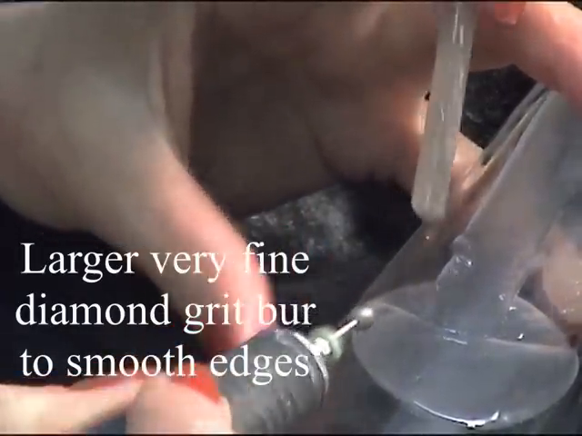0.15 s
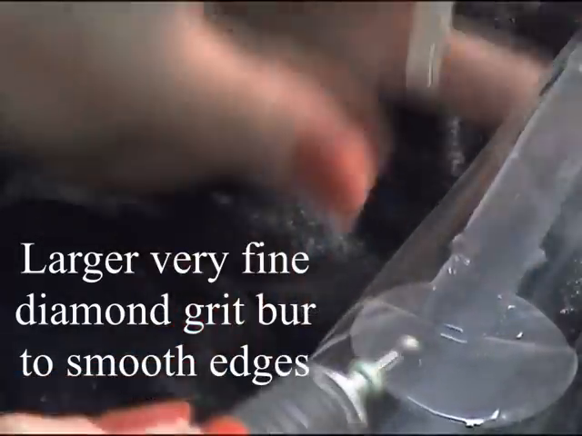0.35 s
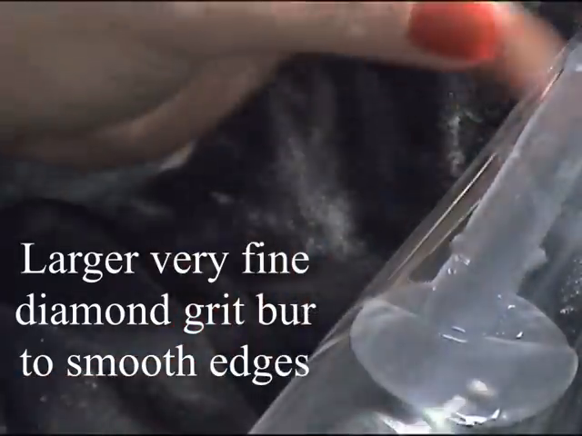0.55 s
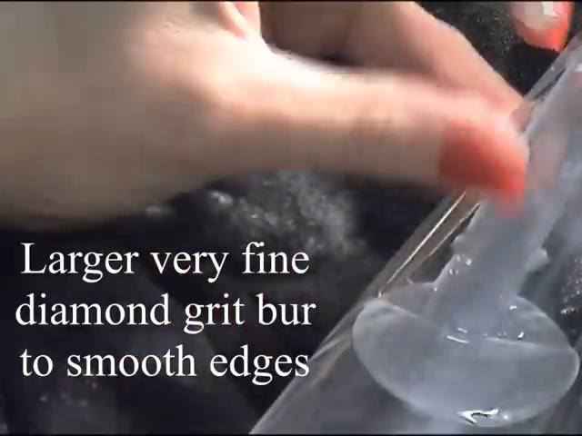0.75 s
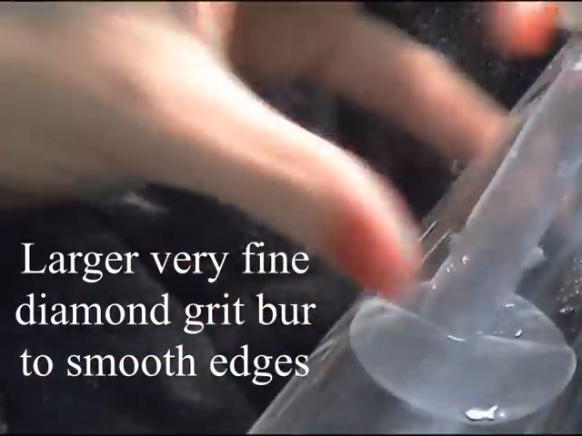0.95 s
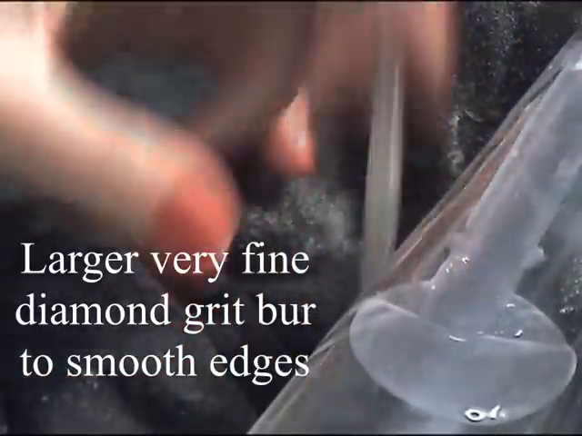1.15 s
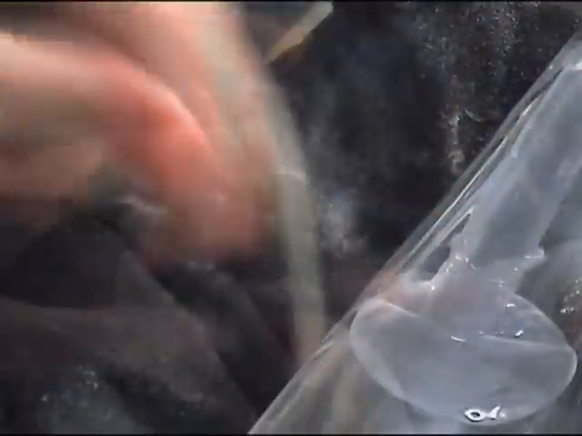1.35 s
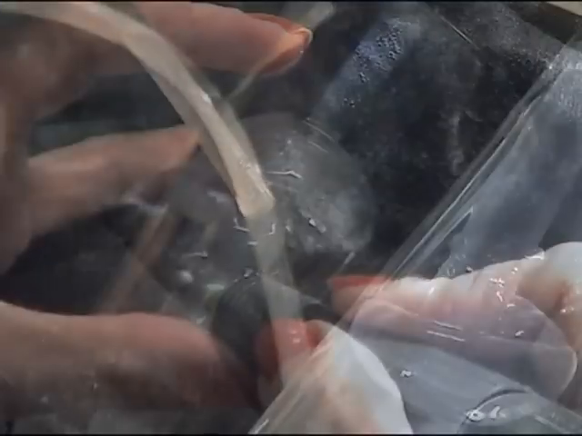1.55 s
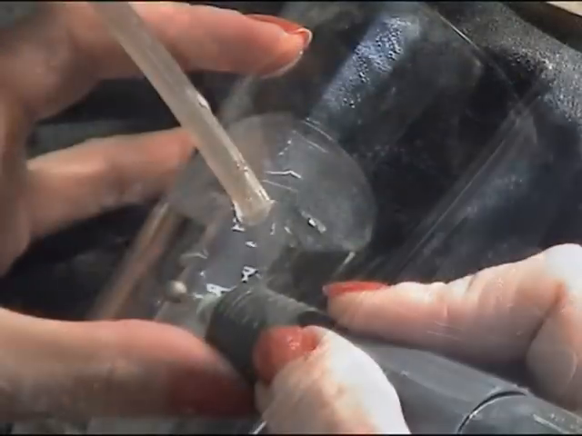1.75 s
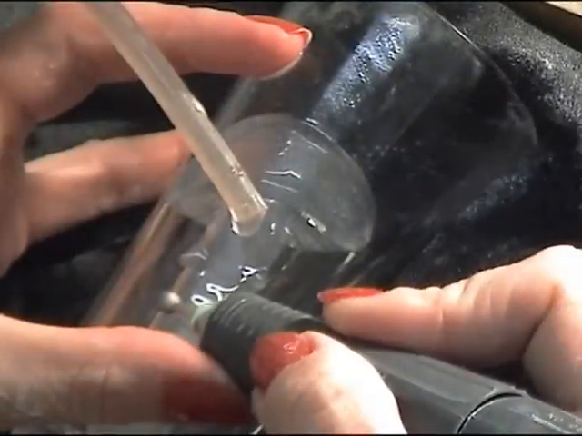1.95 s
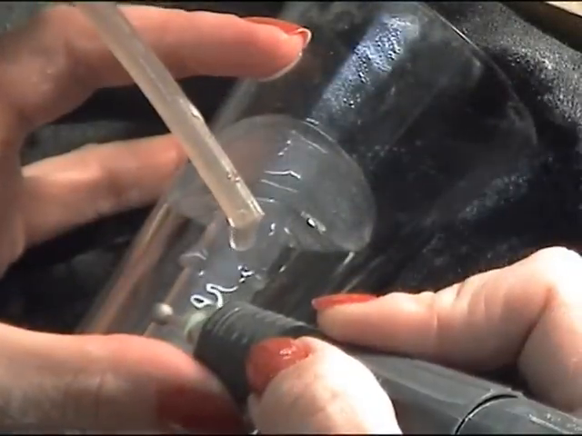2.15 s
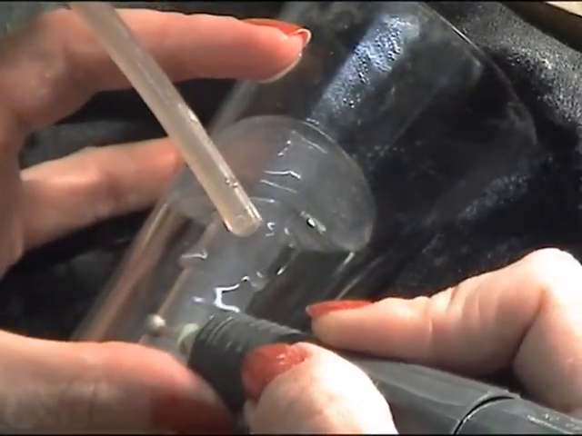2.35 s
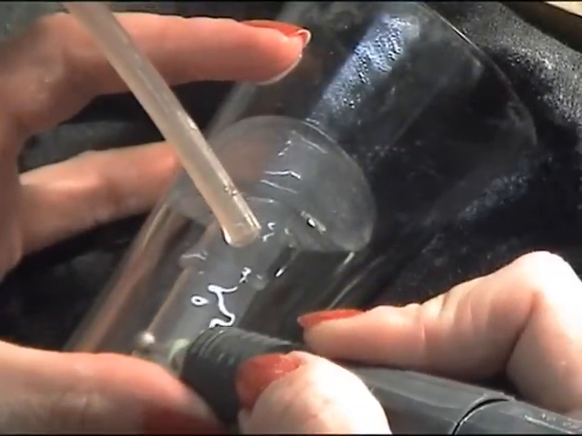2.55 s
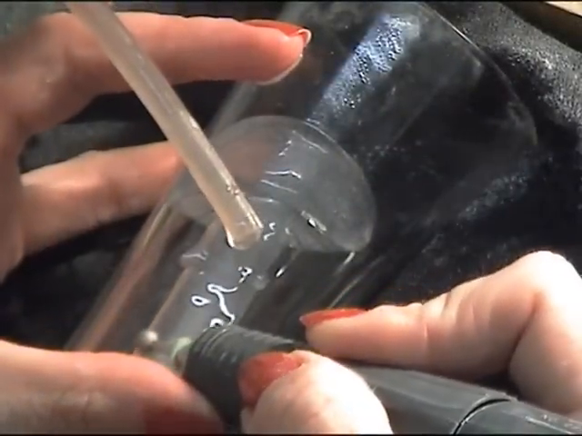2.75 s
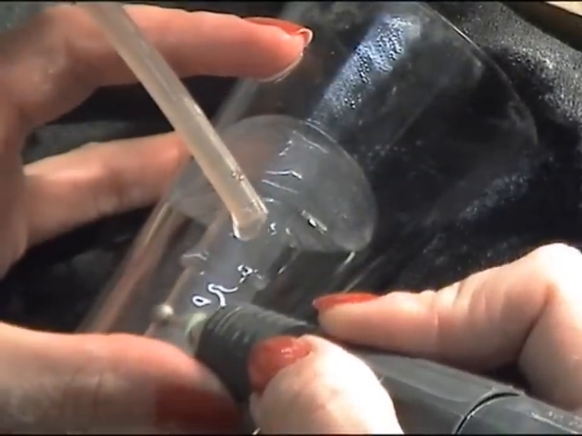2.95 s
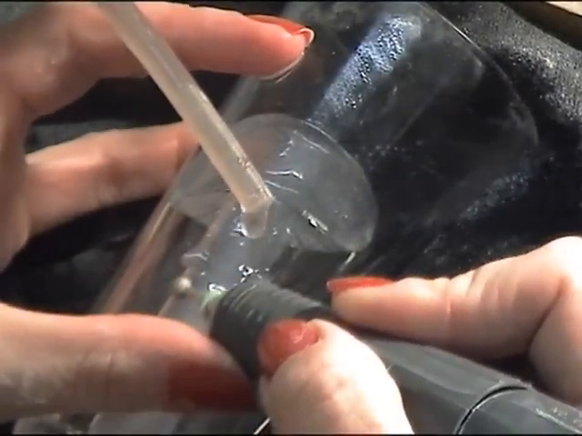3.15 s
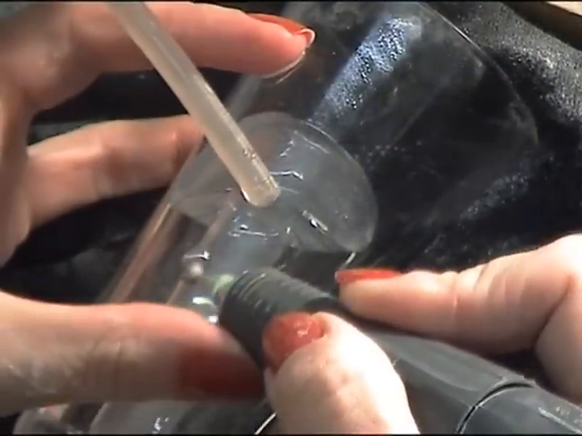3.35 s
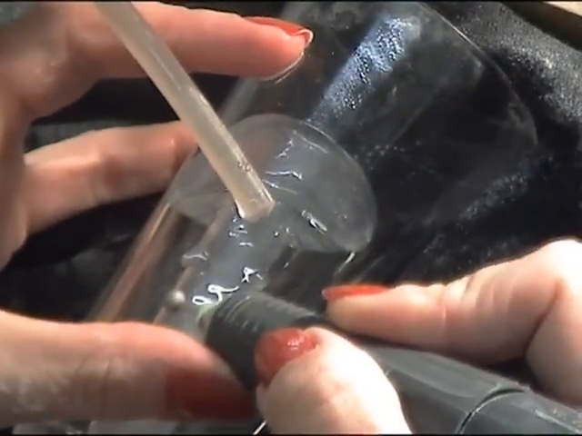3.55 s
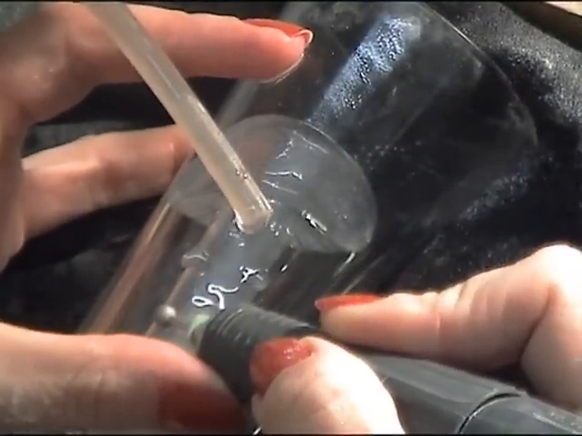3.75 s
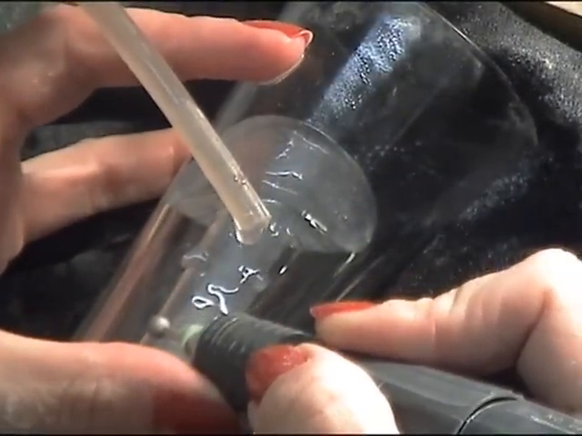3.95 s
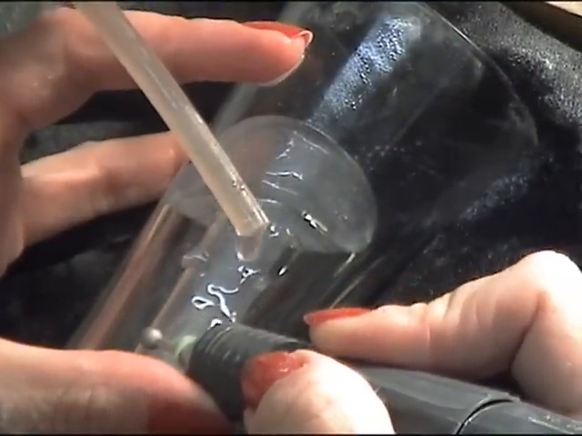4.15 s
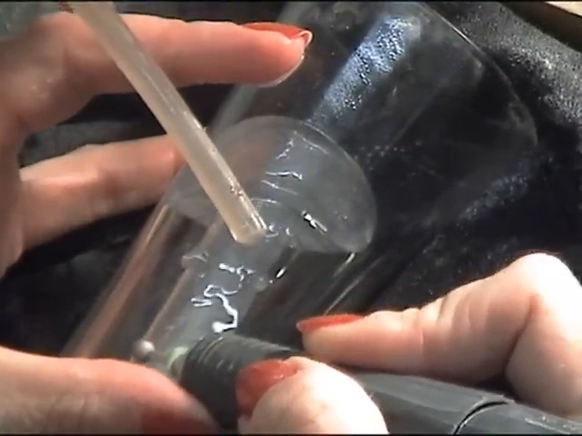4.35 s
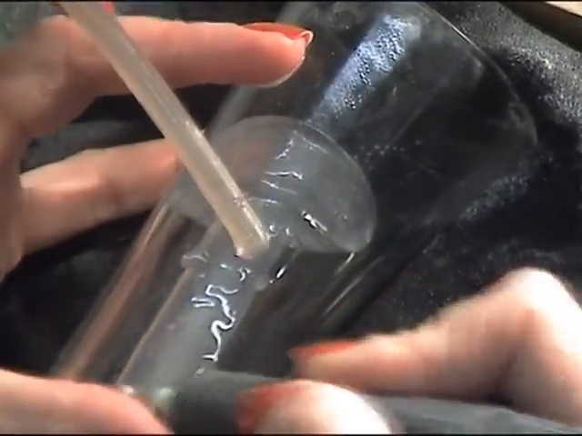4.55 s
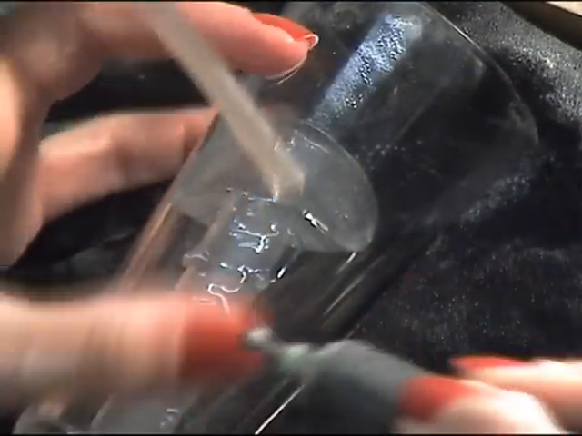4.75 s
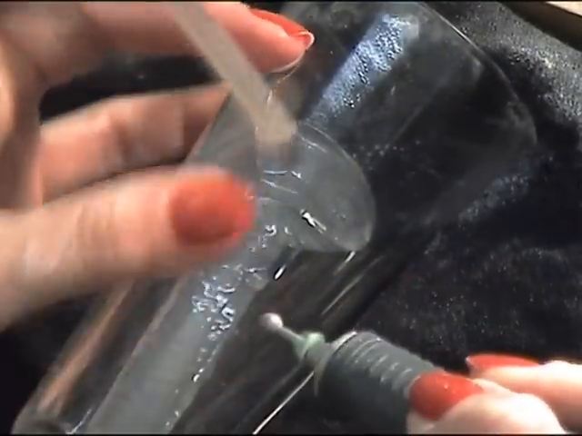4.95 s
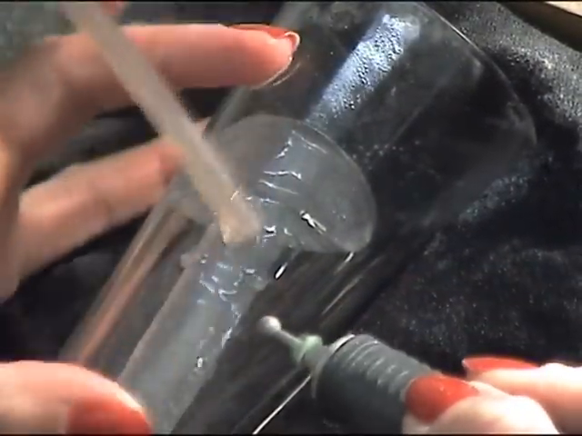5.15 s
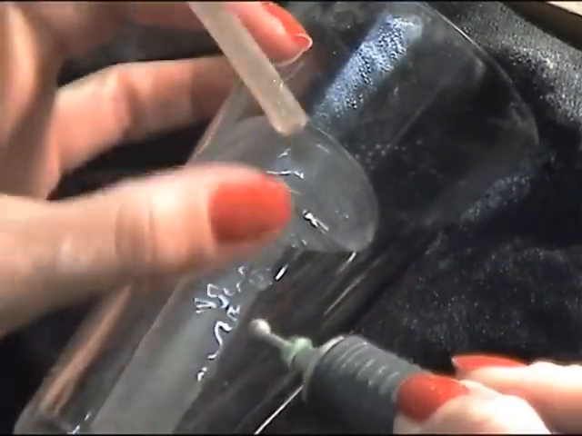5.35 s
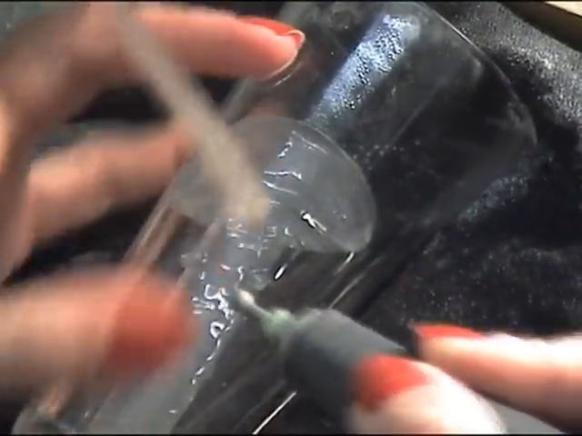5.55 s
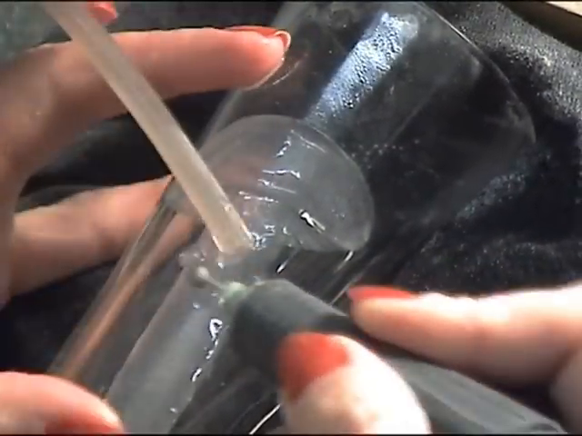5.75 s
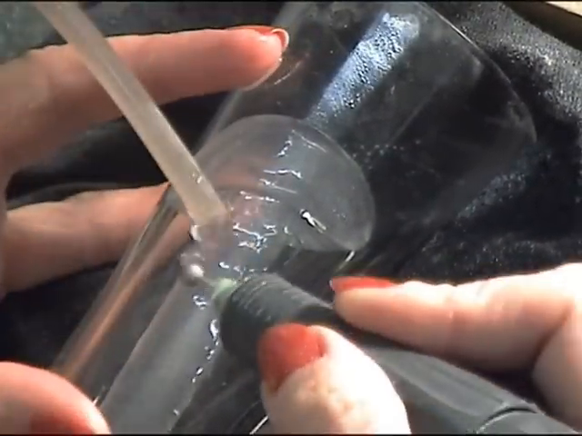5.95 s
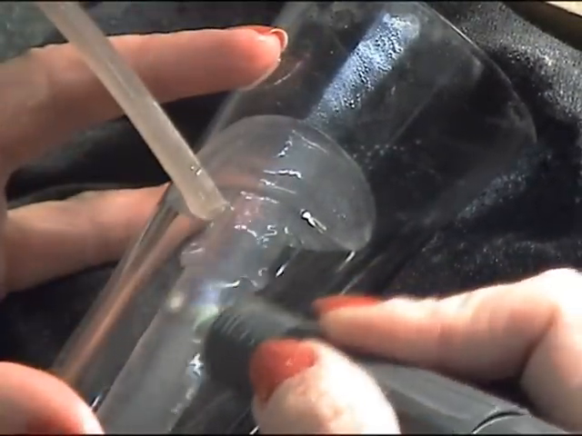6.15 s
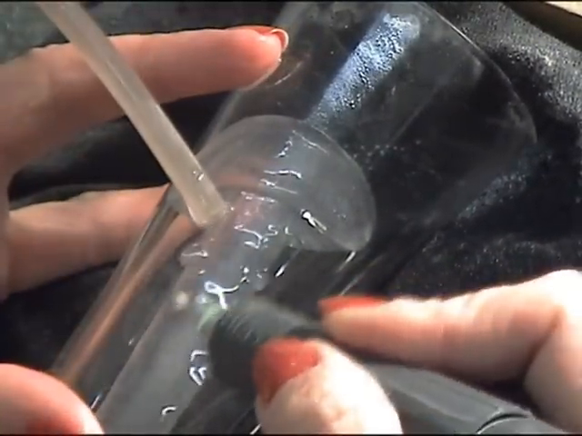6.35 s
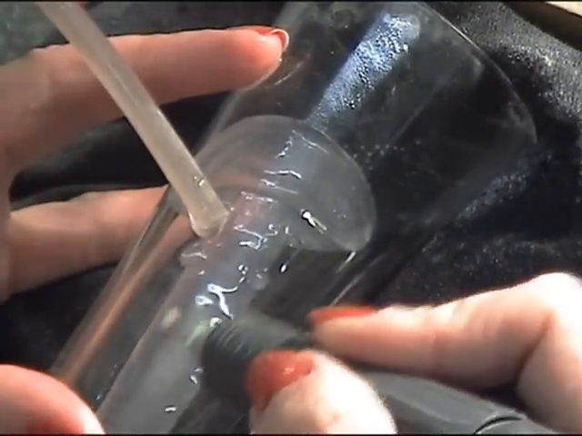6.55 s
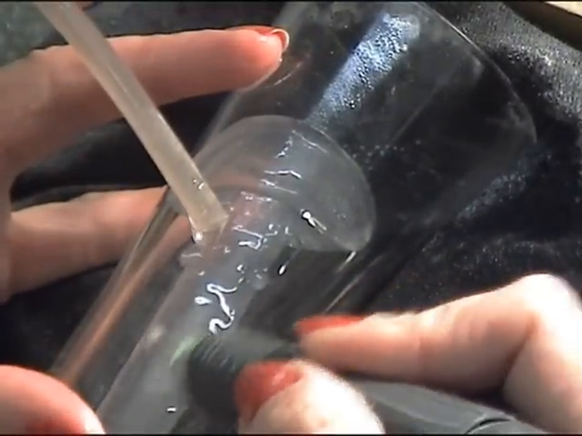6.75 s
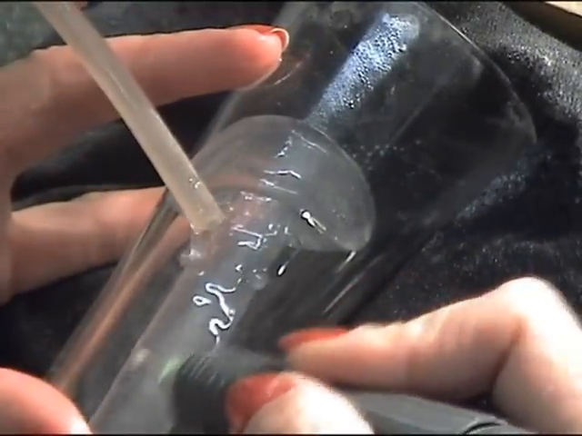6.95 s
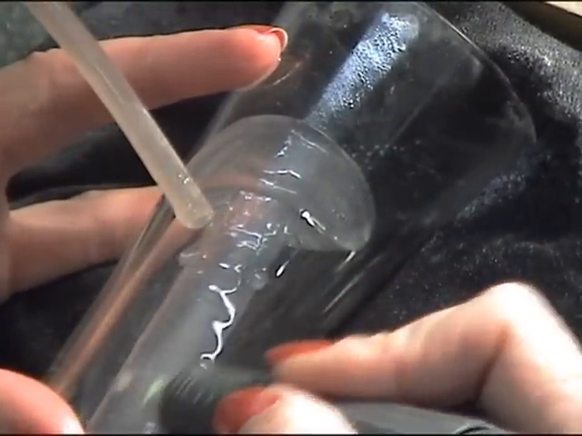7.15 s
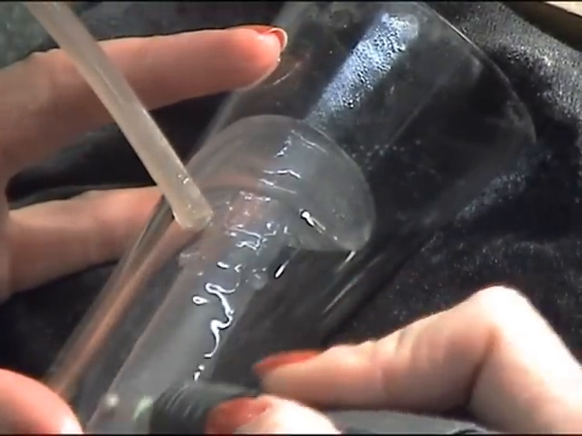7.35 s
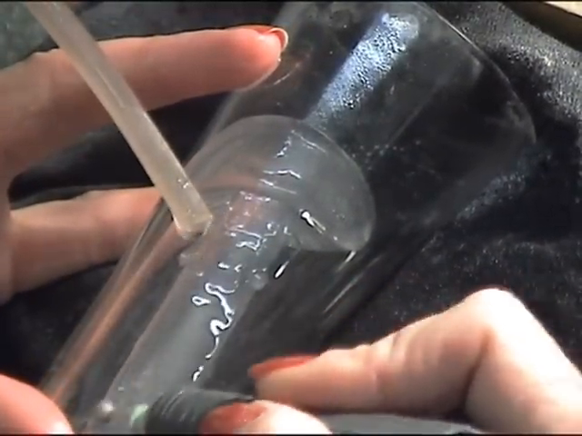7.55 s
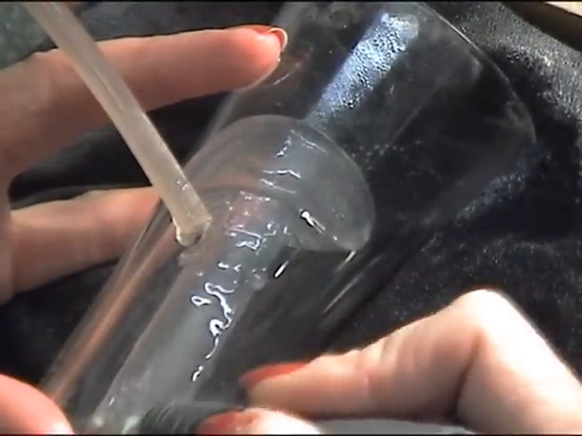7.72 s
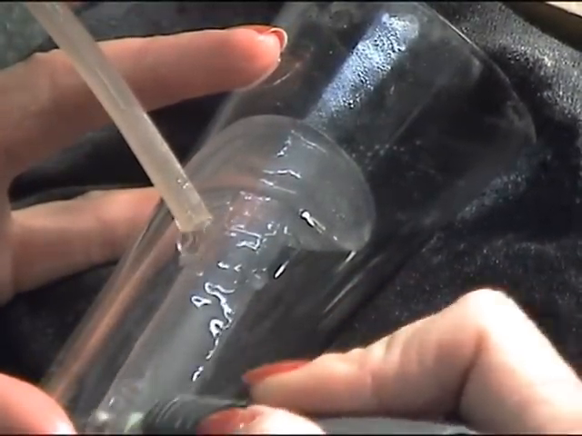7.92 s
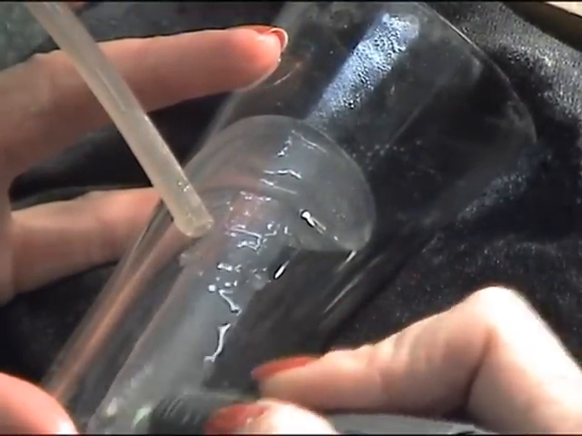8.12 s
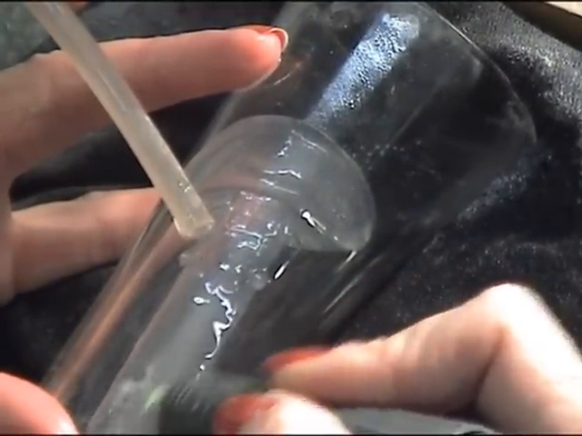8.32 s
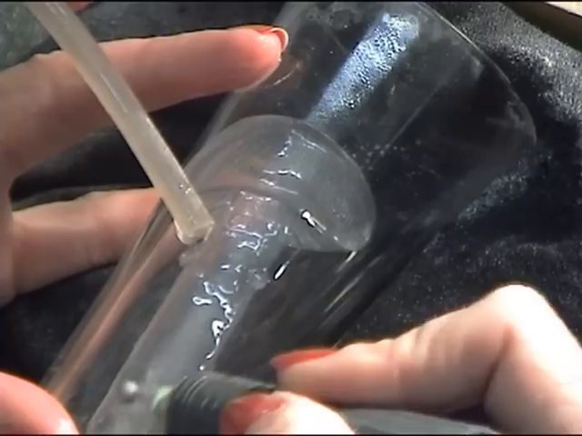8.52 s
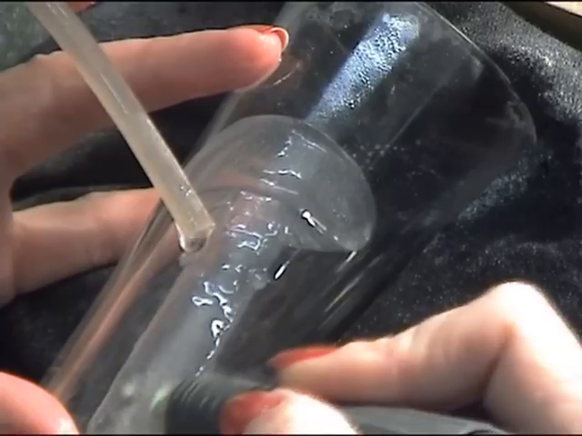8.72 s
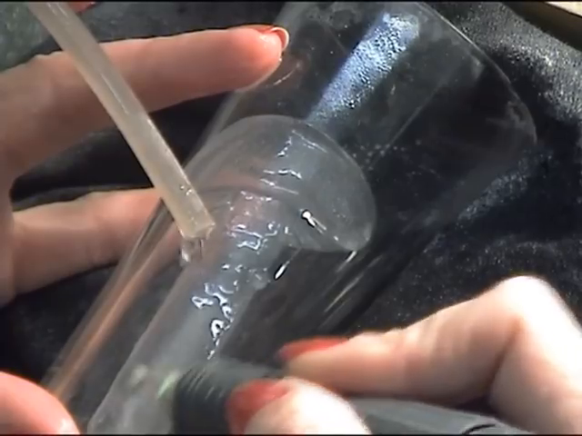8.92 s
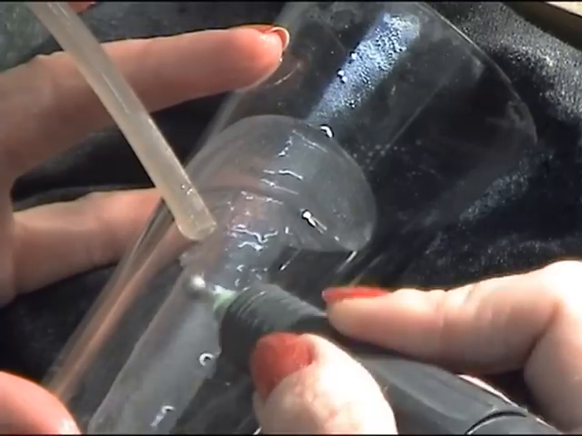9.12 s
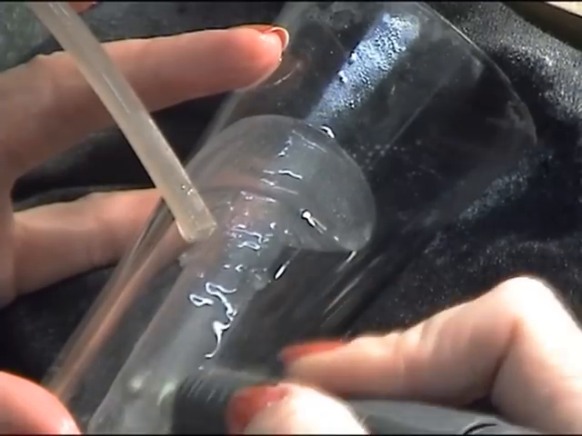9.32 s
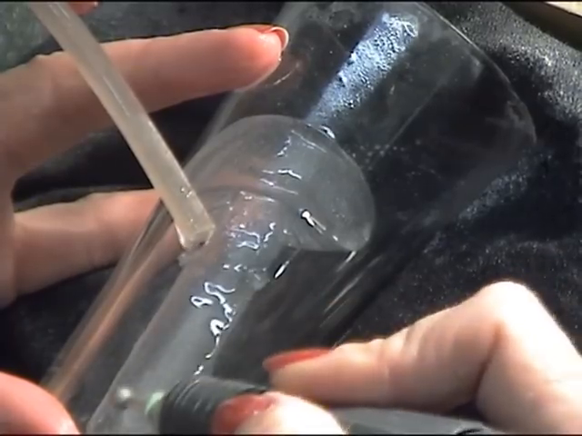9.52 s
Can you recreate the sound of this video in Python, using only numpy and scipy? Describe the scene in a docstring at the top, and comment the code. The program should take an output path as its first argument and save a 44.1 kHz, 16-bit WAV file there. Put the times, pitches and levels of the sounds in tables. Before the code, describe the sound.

A small rotary drill idles and winds down, then whines faster while its fine bur grinds wet glass with hissing, glassy scratching strokes.

```python
"""A small rotary drill with a fine diamond bur smooths wet glass, heard close up.
It idles at low speed and runs down; then, running faster, it grinds one light pass and rubs to and fro.
Its whine is a stack of multiples of the shaft speed, and its bearing hiss is noise that swells each turn.
Grit makes a rough force tied to the turning shaft, which scratches and rings the glass.
A few knocks come from handling; behind it all are workshop air, steady tones and a low drone."""
import sys
import numpy as np
from scipy import signal
from scipy.fft import rfft, irfft
from scipy.io import wavfile
from scipy.ndimage import uniform_filter1d, map_coordinates

SR = 44100
rng = np.random.default_rng(int(sys.argv[2]) if len(sys.argv) > 2 else 0)


def write(x):
    x = np.atleast_2d(x).T
    wavfile.write(sys.argv[1], SR, np.round(np.clip(x, -1, 1) * 32767).astype(np.int16))


N = 426888
TIME = np.arange(N) / SR  # seconds

# Slow run: it idles, is switched off and coasts down; the level falls with the speed.
IDLE_HZ, OFF_S, COAST_S = 326, 1.06, .5
IDLE_DB, COAST_DB_PER_OCTAVE = -38, 20.5
# Whine at low speed, relative levels: (multiple of the shaft speed, level [dB])
SLOW_WHINE = [(1, -15), (2, -22), (3, -19), (4, -10), (5, -13), (6, -5.5), (7, -5), (8, -8), (9, -15),
              (10, -10), (11, -7), (12, -6), (13, -5.5), (14, -5), (15, -5.5), (16, -7), (17, -7), (18, -8),
              (19, -23), (20, -20), (21, -1), (22, -21), (23, 6), (24, -6), (25, 6), (26, -18), (27, -16),
              (28, 0.5), (29, -6), (30, -1), (31, -15), (32, 2), (33, 1), (34, 2), (35, 2), (36, -12),
              (37, -6), (38, -3), (39, -1), (40, 3), (41, -4), (42, -7), (43, 6.5), (44, -5), (45, -5),
              (46, -5), (47, -2)]
# Two partials that swell up before the switch-off and glide down: (multiple of the shaft speed, level [dB])
RUN_DOWN = [(6, -61), (10, -52)]
RUN_DOWN_SWELL_S, RUN_DOWN_DB_PER_OCTAVE = .3, 13

# Fast run: it fades in as the slow run fades out; a firm press slows the shaft.
FAST_HZ, FAST_DB, SAG_HZ = 440.2, -32, 3
FAST_S, FADE_IN_S, FADE_OUT_S = 1.385, 0.36, .08
# Whine at working speed, relative levels: (multiple of the shaft speed, level [dB])
FAST_WHINE = [(1, -43.5), (2, -77), (3, -18), (4, -14.5), (5, -11.5), (6, -11.5), (7, -8.5), (8, -15.5),
              (9, -10), (10, -5.5), (11, -8), (12, -13), (13, -15.5), (14, -15), (15, -12), (16, -26),
              (17, -9), (18, -4), (19, -7), (20, -8), (21, -5), (22, -20), (23, -5.5), (24, -30), (25, -5),
              (26, -12), (27, -8.5), (28, 3), (29, -6), (30, -5), (31, -1), (32, 3), (33, 1.5), (34, -5),
              (35, -13)]
# Boost of the whine by the housing ring near 4.4 kHz: (time [s], boost [dB])
HOUSING_LOW = [(1.5, 1.5), (2.7, 5.5), (3.3, -1), (4.5, 2), (5, -2), (6.4, 0.5), (9.1, -0.5), (9.45, 3)]
# As the hand turns, the ring near 8 kHz swells over its rest: (middle [s], length [s], added boost [dB])
HOUSING_MID, HOUSING_MID_REST_DB = [(2, .3, -3), (2.7, 0.27, -27), (4.05, .35, 6), (4.78, 0.26, 5.5),
                                    (5.9, 0.77, 7)], -1
# So does the ring near 14 kHz: (middle [s], length [s], added boost [dB])
HOUSING_HIGH, HOUSING_HIGH_REST_DB = [(2.3, 0.49, -4), (4.33, .3, -4), (5, .55, -2), (5.5, 0.57, 0)], -8
# Colour of the bearing hiss, relative levels: (frequency [Hz], level [dB per Hz])
BEARING = [(200, -14.5), (800, -11.5), (1500, -8), (1900, -1.5), (2700, 0.5), (4000, -2), (6200, -5.5),
           (7800, -1.5), (10000, -1), (13000, -3.5), (14000, 1), (15500, -6.5)]
# The bearings sizzle as the handpiece tilts, relative levels: (middle [s], length [s], added level [dB])
SIZZLES, SIZZLE_REST_DB = [(2.27, .45, -6), (3.5, .25, -4), (4.33, .3, -5), (5.25, .9, -17)], -22
# The shaft shakes the work, changing with the grip, levels before the load acts:
# (time [s], once a turn [dB], twice a turn [dB])
GRIP_HUM = [(1.5, -51, -53), (2.35, -53.5, -58), (2.9, -49, -45), (3.4, -52, -65), (3.85, -51, -52.5),
            (4.4, -52, -44.5), (4.8, -45.5, -56), (6.7, -53.5, -53.5), (7.15, -50.5, -47.5),
            (8.25, -47, -46), (9.2, -50, -56.5), (9.68, -47.5, -45.5)]
SHAKE_GROWTH = 0.55  # dB of shake per dB of load
FREE_LOAD_DB, LOAD_SMOOTH_S = -25, 0.14  # load of the lifted bur; the press is averaged this long

# The last touch of the slow run lets go: (time [s], press [dB])
LAST_TOUCH = [(0, -8), (.03, -28), (.05, -48)]
# The light pass, eased once on the way: (time [s], press [dB])
LIGHT_PASS = [(1.43, -12), (1.9, -13), (2.2, -8.5), (2.53, -13), (2.72, -33), (2.9, -12), (3.22, -6),
              (3.42, -13), (3.72, -5), (3.95, -5), (4.17, -11), (4.55, -11), (4.62, -29)]
# The bur rests on the glass between rubbing strokes: (time [s], press [dB])
RESTING = [(6.15, -13), (7.25, -11), (7.85, -22), (8.3, -16), (9.1, -12), (9.33, -13), (9.43, -23.5),
           (9.68, -14)]
# Each stroke adds to the resting press and eases again: (middle [s], length [s], added press [dB])
STROKES = [(6.195, 0.046, -2), (6.28, 0.18, -5.5), (6.445, .13, -4.5), (6.63, .17, -2), (6.82, .11, -6),
           (6.95, .15, -4.5), (7.06, 0.09, -3), (7.18, 0.083, -4), (7.385, .17, -2.5), (7.57, 0.093, -1.5),
           (7.76, 0.097, -3.5), (7.945, .11, -3), (8.13, 0.1318, -1.5), (8.315, .12, -2.5),
           (8.46, 0.099, -5.5), (8.64, 0.083, -5), (8.78, 0.15, -7.5), (8.94, .14, -7.5),
           (9.07, 0.17, -4.5), (9.245, 0.18, -0.5), (9.56, .1, -8.5)]
# The low ring grows in step with the press; the scratch and the high ring grow more slowly (dB per dB).
SCRATCH_GROWTH, HIGH_GROWTH = 0.19, 0.5
# Colour of the scratch in the light pass, relative levels: (frequency [Hz], level [dB per Hz])
LIGHT_SCRATCH = [(300, -15.5), (1400, -20), (1900, -3.5), (3400, -11), (4500, -3), (5600, -2.5), (7000, 4),
                 (7900, -1), (9600, -8), (11300, -15), (13600, -12), (15400, -12)]
# Colour of the scratch in the touch and rubbing, relative levels: (frequency [Hz], level [dB per Hz])
RUB_SCRATCH = [(300, -23.5), (1400, -25.5), (2100, -7.5), (2600, -18), (3100, -7.5), (3700, -16.5),
               (4900, -4.5), (5900, -9.5), (7200, 9), (7900, 1), (8700, -4.5), (10600, -7.5), (13300, -2),
               (15200, -28)]
# Lower wall modes of the glass, relative levels: (frequency [Hz], width [Hz], level [dB])
GLASS_LOW = [(4800, 130, -21), (5275, 63, -12.5), (6575, 51, -1), (6695, 15.6, 10.5), (6832, 46, 2.5),
             (7030, 33, -8), (6990, 95, -8.5), (7420, 94, -4.5), (7840, 84, -11), (8760, 56, -10),
             (9120, 71, -9.5)]
# Upper wall modes of the glass, relative levels: (frequency [Hz], width [Hz], level [dB])
GLASS_HIGH = [(10100, 25, -11), (11520, 18, -8.5), (11870, 29, -4), (12190, 50, 1.5), (12390, 77, 1.5),
              (12450, 47, -4.5), (12540, 32, 1.5), (12700, 77, -17)]
# The high ring depends on where the bur sits along the wall: (time [s], change [dB])
HIGH_PLACE = [(0, 0), (2.4, -2.5), (3.4, -2), (4.4, 2), (6.25, -2.5), (7.4, 1), (8.1, 0.5), (8.7, -2),
              (9.3, 1.5), (9.68, -5)]
# In the light pass one wall mode sings above its rest: (middle [s], length [s], added level [dB])
SINGING = [(2.1, 1, -46), (3.05, 0.65, -36), (3.8, 0.99, -45)]
SINGING_HZ = 9200
# The bur chatters in the light pass: (time [s], level [dB], centre of the buzz [Hz])
CHATTER = [(1.5, -65, 2100), (1.85, -39, 2080), (2.04, -40, 2104), (2.1, -47, 1730), (2.75, -50.5, 1700),
           (3.22, -43, 1900), (3.65, -46, 1810), (3.85, -59, 1640), (4.62, -57, 1600)]
# The bur catches an edge, relative peaks: (time [s], peak [dB])
CATCHES = [(6.1484, -15), (6.1816, -16), (7.2574, -16), (9.3573, -13), (9.3662, -18), (9.3873, -10.5),
           (9.3974, -25), (9.429, -13.5), (9.5298, -14.5), (9.5486, -24), (9.5754, -24), (9.5822, -18)]
# Handling bumps: (time [s], peak [dB], centre [Hz], half the width of each filter [Hz],
# time for the push to fade by 60 dB [s])
BUMPS = [(1.127, -30.5, 440, 130, 0.13), (4.793, -26, 1500, 1300, 0.12), (4.825, -25, 2960, 2600, 0.14),
         (5.74, -42, 683, 200, 0.29)]

# Colour of the workshop air, relative levels: (frequency [Hz], level [dB per Hz])
ROOM_AIR, ROOM_AIR_DB = [(25, 2.5), (60, 4), (150, 7), (300, -2), (800, -2.5), (1900, 4), (3200, -9),
                         (6000, 1), (15000, -16)], -50
# Steady workshop tones, relative levels: (frequency [Hz], level [dB])
ROOM_TONES = [(581.4, -64), (899.0, -63.5), (1163, -65.5), (1502, -63), (1798, -59.5), (2099, -59.5)]
# Low drone, relative levels: (time [s], level [dB])
DRONE = [(0, -82), (.8, -69), (1.45, -55.5), (1.8, -62.5), (2.5, -67), (2.7, -52), (3.35, -54.5),
         (3.9, -51.5), (4.45, -56), (5, -51.5), (5.5, -57.5), (6.8, -60), (7.3, -71), (9.68, -71)]
# Pitch around which the drone wavers: (time [s], pitch [Hz])
DRONE_PITCH = [(0, 78), (1.4, 81.9), (2.4, 81.7), (2.7, 89.75), (5, 86.4), (6, 82.2), (9.68, 80.05)]

# The two microphone ports at full lean: (frequency [Hz], left minus right [dB])
PORT_BALANCE = [(0, 0.11), (4000, 0), (6700, 2.06), (8200, 1.7), (12300, 2.4), (14200, 0)]
# Timing of the ports: (frequency [Hz], lead of the left [radians])
PORT_PHASE = [(0, 0.019), (15200, -0.11)]
TOP_HZ = 15300


def undb(db):
    """Decibels to gain."""
    return 10 ** (np.asarray(db) / 20)


def unit(x):
    """Scale to an average strength (rms) of 1."""
    return x / np.sqrt(np.mean(x ** 2))


def curves(table):
    """Each column of a table as a line through time."""
    s, *columns = np.transpose(table)
    return [np.interp(TIME, s, c) for c in columns]


def swells(table, rest_db):
    """Smooth rises and falls (half a cosine each) added to a resting gain; the result is in dB."""
    gain = undb(rest_db)
    for middle, length, db in table:
        gain = gain + undb(db) * np.cos(np.pi * np.clip((TIME - middle) / length, -.5, .5))
    return 20 * np.log10(gain)


def during(table, fade=0.0031):
    """One while the table lasts, zero outside, with short fades."""
    return np.clip(np.minimum(TIME - table[0][0], table[-1][0] - TIME) / fade + 1, 0, 1)


def fade_in(seconds):
    """From zero to one as the fast run comes in."""
    return np.clip((TIME - FAST_S) / seconds, 0, 1)


def walk(rate):
    """Slow chance: lines joining random points, rate points a second, with a spread near one."""
    points = rng.standard_normal(4096)
    return 1.2 * np.interp(TIME * rate, np.arange(len(points)), points)


def colour(x, points):
    """Shape a sound with a smooth (Hz, dB) spectrum and scale it to rms 1."""
    hz, db = np.transpose(points)
    f = np.maximum(np.arange(N // 2 + 1) * SR / N, 1)
    gain = undb(np.interp(np.log(f), np.log(hz), db))
    gain = gain * np.minimum(f / hz[0], 1)  # weaker below the first point
    return unit(irfft(rfft(x) * gain, N))


def resonate(x, hz, width):
    """One resonance, gain one at its centre."""
    return signal.lfilter(*signal.iirpeak(hz, hz / width, fs=SR), x)


def shaft(speed, wobble):
    """Turns made so far; the speed trembles a little."""
    return np.cumsum(speed * (1 + wobble * walk(40))) / SR


def whine(turns, orders, phases, flicker_db, rings=()):
    """Multiples of the shaft speed; each flickers, and those near a housing ring follow it."""
    out = 0
    total = np.sqrt(sum(undb(db) ** 2 for _, db in orders) / 2)
    for (k, db), phase in zip(orders, phases):
        db = db + flicker_db * walk(4)
        for centre, spread, ring_db in rings:
            db = db + ring_db * np.exp(-((k - centre) / spread) ** 2)
        angle = 2 * np.pi * ((k * turns + phase) % 1)
        out = out + undb(db.astype(np.float32)) * np.sin(angle.astype(np.float32))
    return out / total


def bearing(turns, depth):
    """Ball bearings hiss, swelling once a turn."""
    swell = 1 + depth * np.cos(2 * np.pi * turns)
    return colour(rng.standard_normal(N) * swell, BEARING)


def slow_run(turns, speed):
    """The drill idles and is switched off; coasting, high partials die first and low ones glide on."""
    octaves = np.log2(speed / IDLE_HZ)
    drive = np.minimum(speed / IDLE_HZ, 1) ** 6
    rings = [(36, 17, -28 * np.sqrt(1 - drive))]  # a dip in the high partials as the drive goes
    tone = whine(turns, SLOW_WHINE, rng.random(len(SLOW_WHINE)), flicker_db=3.5, rings=rings)
    hiss = bearing(turns, depth=0.25)
    coasting = np.sqrt(1 - drive) * unit(resonate(hiss, 8600, 3500))
    running = tone + undb(-4.5) * hiss + undb(-1.0) * coasting
    running = running * undb(IDLE_DB + COAST_DB_PER_OCTAVE * octaves)
    swell = np.clip((TIME - OFF_S) / RUN_DOWN_SWELL_S + 1, 0, 1)
    swell = swell * undb(RUN_DOWN_DB_PER_OCTAVE * octaves)
    glide = swell * sum(undb(db + 2 * walk(20)) * unit(np.sin(2 * np.pi * k * turns)) for k, db in RUN_DOWN)
    return (running + glide) * (1 - fade_in(FADE_OUT_S))


def fast_run(turns, load):
    """The drill at working speed; under load its imbalance shakes the work."""
    (low_db,) = curves(HOUSING_LOW)
    mid_db = swells(HOUSING_MID, HOUSING_MID_REST_DB)
    high_db = swells(HOUSING_HIGH, HOUSING_HIGH_REST_DB)
    rings = [(10, .9, low_db), (18, 1.4, mid_db), (32, 1.8, high_db)]  # centre and spread in multiples
    phases = rng.random(len(FAST_WHINE))
    tone = whine(turns, FAST_WHINE, phases, flicker_db=2.5, rings=rings)
    sizzle = resonate(resonate(bearing(turns, depth=.5), 13540, 1600), 14700, 1600)
    sizzle = undb(swells(SIZZLES, SIZZLE_REST_DB)) * unit(sizzle)
    sound = undb(-1.0) * tone + undb(-3) * bearing(turns, depth=0.26) + sizzle
    shake = 0
    for k, db in enumerate(curves(GRIP_HUM), 1):
        hum = unit(np.sin(2 * np.pi * (k * turns + phases[k - 1])))
        shake = shake + undb(db + 1.7 * walk(6.1)) * hum
    return sound * undb(FAST_DB) + shake * load ** SHAKE_GROWTH


def grit(turns, memory, track_db, chip_db, spread_db, swell, bounce):
    """Force at the bur: the same diamonds return every second turn, among fresh chips of random size."""
    size = 200  # random points in each two-turn pattern
    memory = np.clip(memory, 0, .99)  # how much of the pattern stays from one pass to the next
    passes = rng.standard_normal((int(turns[-1] / 2) + 2, size))
    track = signal.lfilter([1], [1, -memory], passes, axis=0).ravel()
    track = unit(map_coordinates(track, [turns / 2 * size], order=3))
    chip_size = undb(spread_db * np.minimum(rng.exponential(size=N), 3))
    chips = (rng.random(N) < 5000 / SR) * rng.choice([-1, 1], N) * chip_size  # about 5000 a second
    # The bur runs slightly off centre and bounces, so strong and weak turns alternate.
    contact = np.exp(swell * np.cos(2 * np.pi * turns) + bounce * np.cos(np.pi * turns))
    return unit((undb(track_db) * track + undb(chip_db) * unit(chips)) * contact)


def hops(rate_hz, uneven, contact):
    """The bur hops on the wall at an uneven pace; each landing is sudden and fades within a hop."""
    count = np.cumsum(rate_hz * np.exp(uneven * walk(110))) / SR
    size = rng.uniform(0.73, 1, int(count[-1]) + 1)
    return size[count.astype(int)] * np.exp(-(count % 1) / contact)


def ring(x, modes):
    """A body's modes, all driven by the same force; neighbours swing in opposite senses."""
    return sum((-1) ** k * undb(db) * resonate(x, hz, width) for k, (hz, width, db) in enumerate(modes))


def grind(press_db, force, scratch, scratch_db, low_db, high_db, judder_db, tilt_db, waver_db):
    """The grit scratches and rings two families of wall modes as the hand presses and eases."""
    rasp = undb(SCRATCH_GROWTH * press_db)
    # Each family wavers on its own as the point of contact moves.
    low = undb(press_db + waver_db * walk(25))
    high = undb(HIGH_GROWTH * press_db + curves(HIGH_PLACE)[0] + waver_db * walk(25))
    # A positive tilt favours the upper of these modes, a negative one the lower (dB per octave).
    modes = [(hz, width, db + tilt_db * np.log2(hz)) for hz, width, db in GLASS_LOW]
    # The landings go mostly into the low modes.
    judder = judder_db * hops(rate_hz=160, uneven=.4, contact=0.36)
    scratching = rasp * colour(force * undb(0.35 * judder), scratch)
    low_ring = low * unit(ring(force * undb(judder), modes))
    high_ring = high * unit(ring(force * undb(judder / 2), GLASS_HIGH))
    return undb(scratch_db) * scratching + undb(low_db) * low_ring + undb(high_db) * high_ring


def singing(force, width_hz):
    """The lightly held bur keeps one narrow mode of the wall ringing."""
    return undb(swells(SINGING, rest_db=-56)) * unit(resonate(force, SINGING_HZ, width_hz))


def chatter(turns, width_hz):
    """Lightly held, the bur bounces every second turn and buzzes a resonance of the shank."""
    level_db, centre = curves(CHATTER)
    out = 0
    for k in np.arange(6, 14) / 2:  # half steps, for a bounce every second turn
        detune = 2 * (k * FAST_HZ - centre) / width_hz
        out = out + np.cos(2 * np.pi * k * turns - np.arctan(detune)) / np.hypot(1, detune)
    return unit(out) * undb(level_db) * during(CHATTER)


def catches(crack_s, crack_db, damping, gain_db):
    """Single hard strikes: a crack and a ping that the wet fingers damp."""
    t, out = TIME[:2000], np.zeros(N + 2000)
    for s, db in CATCHES:
        ping = 0
        for hz, width, mode_db in GLASS_LOW:
            fade = np.exp(-np.pi * (width + damping) * t)
            ping = ping + undb(mode_db) * np.sin(2 * np.pi * hz * t) * fade
        crack = resonate(rng.standard_normal(len(t)) * np.exp(-t / crack_s), 10700, 3500)
        hit = ping / abs(ping).max() + undb(crack_db) * crack / abs(crack).max()
        start = int(s * SR)
        out[start:start + len(t)] += undb(db + gain_db) * hit / abs(hit).max()
    return out[:N]


def bumps():
    """Dull knocks as the hands shift the glass on its cloth: fading noise through two resonances."""
    out = 0
    for s, db, hz, width, t60 in BUMPS:
        push = rng.standard_normal(N) * (TIME > s) * np.exp(-np.log(1000) * abs(TIME - s) / t60)
        knock = resonate(resonate(push, hz, 2 * width), hz, 2 * width)
        out = out + undb(db) * knock / abs(knock).max()
    return out


def workshop():
    """Room air as shaped noise, a few steady machine tones and a low wavering drone."""
    air = colour(rng.standard_normal(N), ROOM_AIR)
    # A faint noise, opposite in the two ears, mostly low rumble.
    side = colour(rng.standard_normal(N), [(30, 7), (150, 9), (400, 0), (2000, -24), (15000, -24)])
    tones = sum(undb(db + 0.53 * walk(4.6)) * unit(np.sin(2 * np.pi * hz * TIME)) for hz, db in ROOM_TONES)
    (drone_db,), (pitch,) = curves(DRONE), curves(DRONE_PITCH)
    angle = 2 * np.pi * np.cumsum(pitch + 3 * walk(25)) / SR
    drone = sum(undb(db) * np.sin(k * angle) for k, db in enumerate([0, -13, -9], 1))
    drone = unit(drone * undb(2.5 * walk(24)))
    middle = undb(ROOM_AIR_DB) * air + undb(-1) * tones + undb(drone_db - 1.5) * drone
    return middle + undb(-66) * side * np.array([[1], [-1]])


def ports(x, scatter_db, lean):
    """Two close ports differ mostly in the treble, with uneven scatter; lean scales the level difference."""
    f = np.arange(N // 2 + 1) * SR / N
    balance, phase = (np.interp(f, *np.transpose(table)) for table in (PORT_BALANCE, PORT_PHASE))
    half = undb(lean * balance / 2) * np.exp(1j * phase / 2)
    echoes = rng.standard_normal(512)
    scatter = undb(scatter_db) * (f / TOP_HZ) ** 2 * rfft(echoes / np.linalg.norm(echoes), N)
    return irfft(rfft(x) * np.array([half + scatter, 1 / half - scatter]), N)


def scene():
    """Drill, three spells of grinding, handling and room; the press drives grinding, speed and shake."""
    (touch_db,), (light_db,), (resting_db,) = curves(LAST_TOUCH), curves(LIGHT_PASS), curves(RESTING)
    rub_db = swells(STROKES, resting_db)
    press = undb(light_db) * during(LIGHT_PASS) + undb(rub_db) * during(RESTING)
    load = undb(FREE_LOAD_DB) + uniform_filter1d(press, int(LOAD_SMOOTH_S * SR))
    slow_hz = IDLE_HZ * np.exp(-np.maximum(TIME - OFF_S, 0) / COAST_S)
    slow = shaft(slow_hz, wobble=0.0005)
    fast = shaft(FAST_HZ - SAG_HZ * load, wobble=.00025)

    touch = grit(slow, memory=0.4, track_db=-3, chip_db=-2, spread_db=1, swell=.4, bounce=.2)
    light = grit(fast, memory=0.9, track_db=-2, chip_db=-4.0, spread_db=2.0, swell=0.73, bounce=0.057)
    heavy = grit(fast, memory=0.75, track_db=0.0, chip_db=0.5, spread_db=5.5, swell=0.29, bounce=0.27)
    touching = grind(touch_db, touch, RUB_SCRATCH, scratch_db=-35.5, low_db=-19.5, high_db=-26.5,
                     judder_db=4, tilt_db=-26, waver_db=-1.0)
    passing = grind(light_db, light, LIGHT_SCRATCH, scratch_db=-33.0, low_db=-20, high_db=-25.0,
                    judder_db=5.5, tilt_db=9, waver_db=1.1)
    rubbing = grind(rub_db, heavy, RUB_SCRATCH, scratch_db=-24.5, low_db=-21.5, high_db=-25.0,
                    judder_db=14.5, tilt_db=-4.0, waver_db=1.17)
    strikes = catches(crack_s=.0008, crack_db=-3, damping=30, gain_db=2)

    passing = (passing + singing(light, width_hz=36)) * during(LIGHT_PASS)
    working = chatter(fast, width_hz=115) + passing + rubbing * during(RESTING)
    drill = slow_run(slow, slow_hz) + fast_run(fast, load) * fade_in(FADE_IN_S)
    glass = touching * during(LAST_TOUCH) + working * fade_in(FADE_IN_S) + strikes + bumps()
    near = ports(drill, scatter_db=-10, lean=0.17) + ports(glass, scatter_db=-15.5, lean=0.81)
    return near + workshop()


def record(dry):
    """A steep filter removes the very highest treble."""
    return signal.sosfilt(signal.ellip(10, .2, 80, TOP_HZ, fs=SR, output="sos"), dry)


dry = scene()
out = record(dry)
write(out)
```